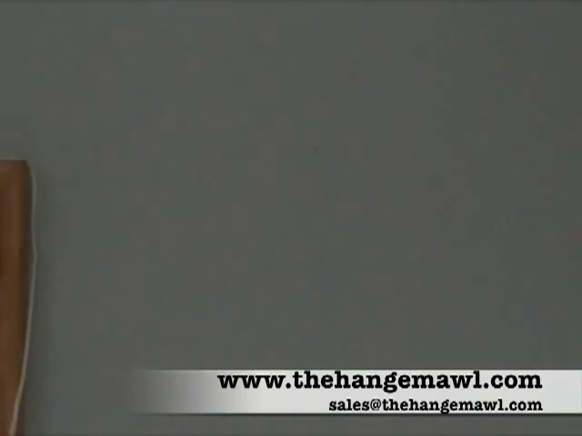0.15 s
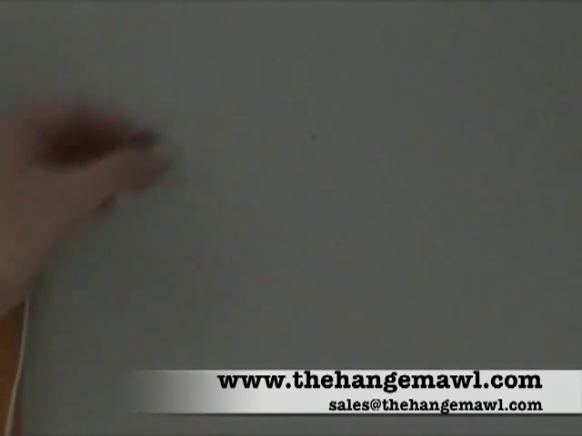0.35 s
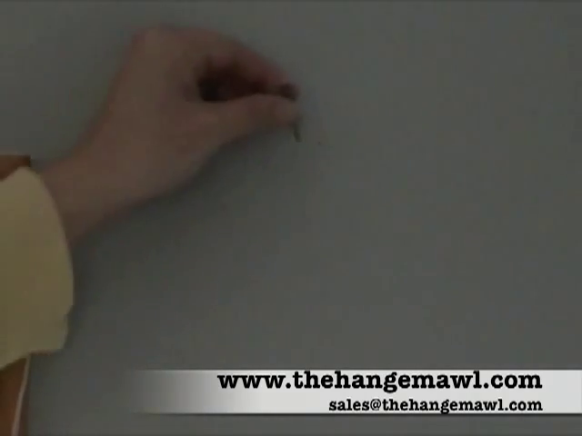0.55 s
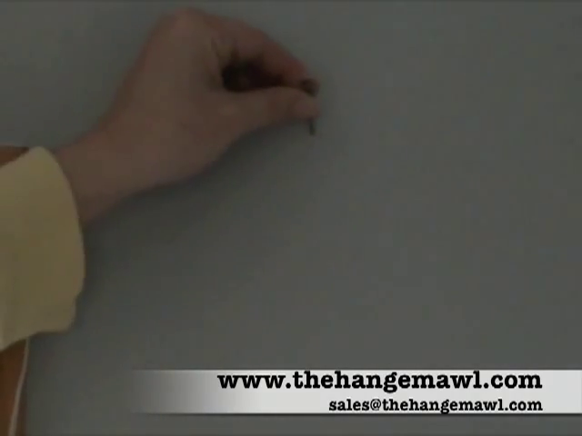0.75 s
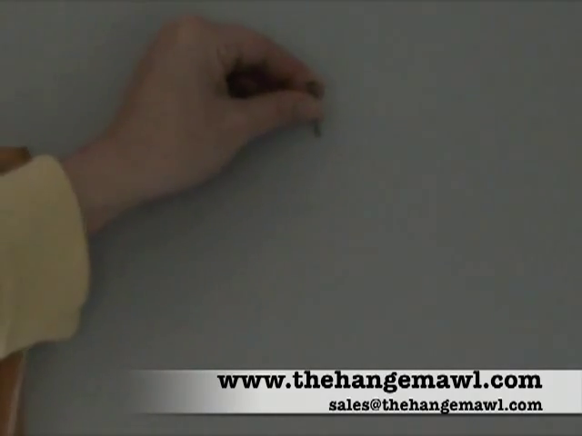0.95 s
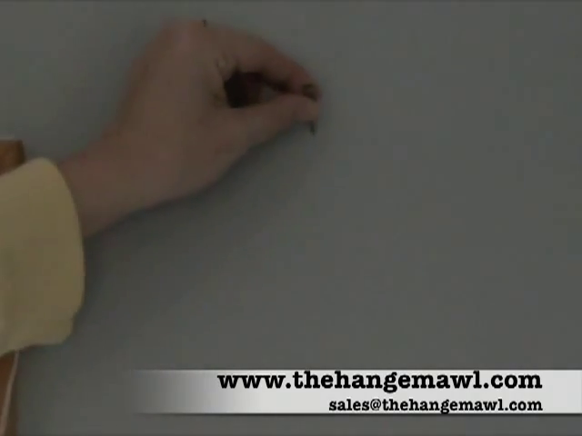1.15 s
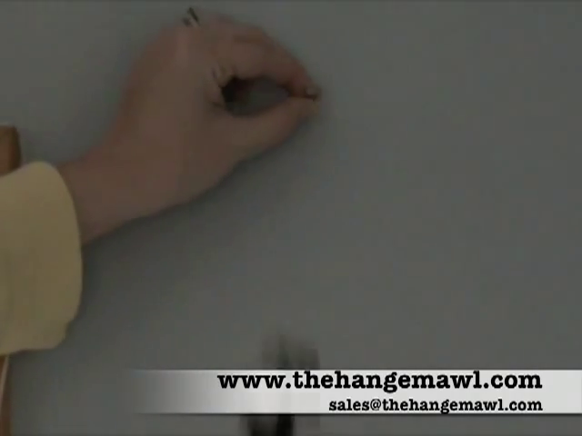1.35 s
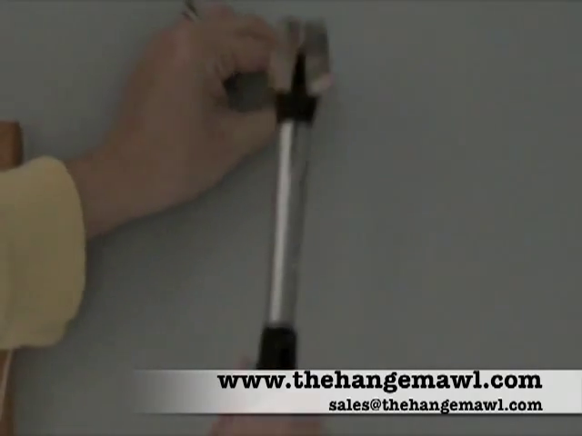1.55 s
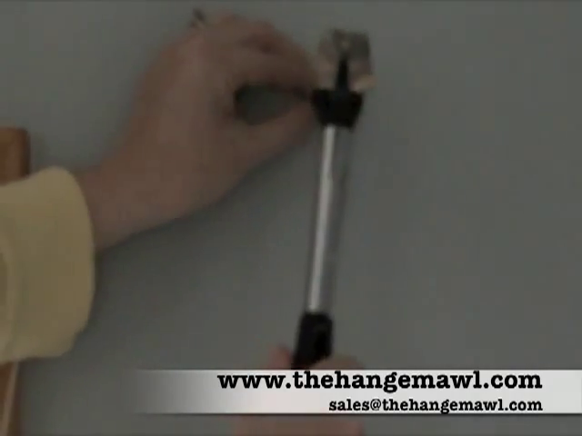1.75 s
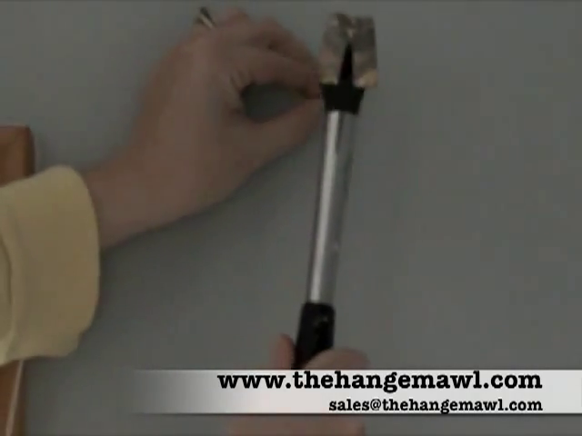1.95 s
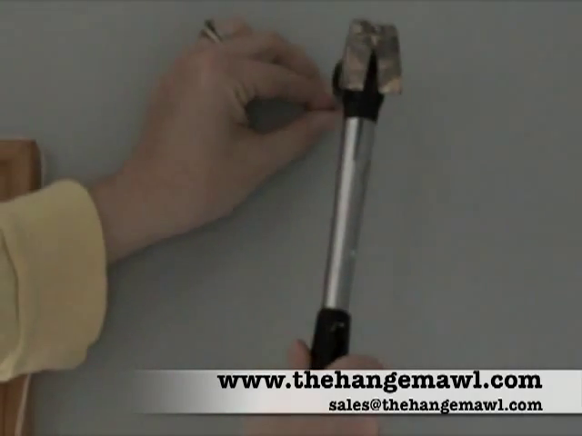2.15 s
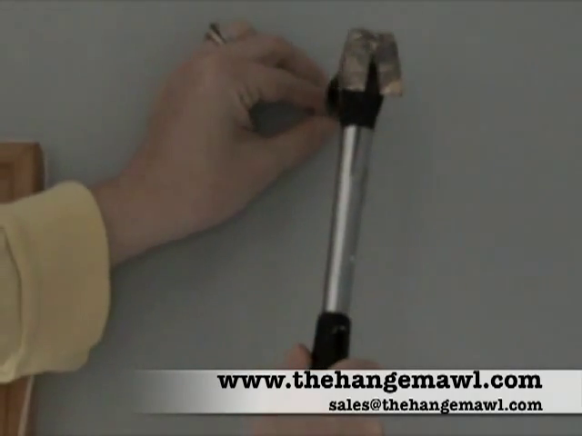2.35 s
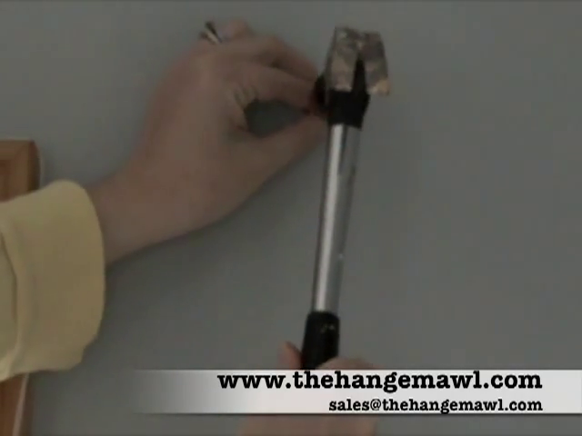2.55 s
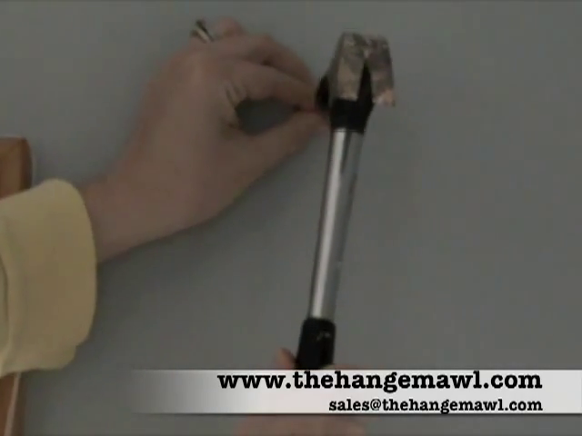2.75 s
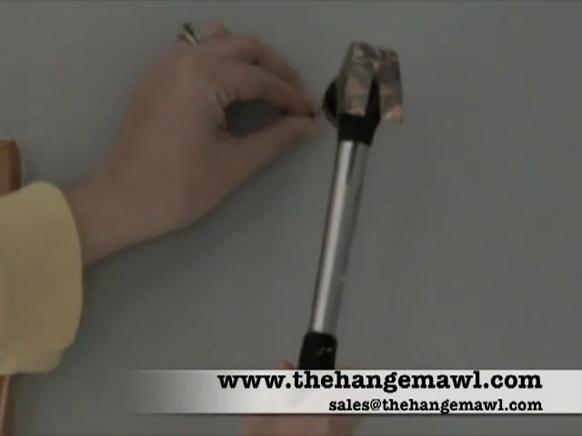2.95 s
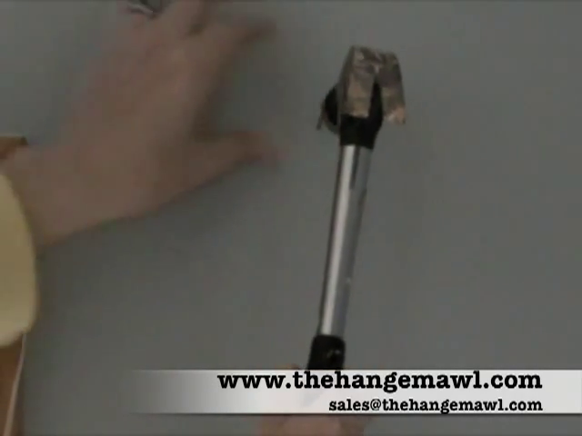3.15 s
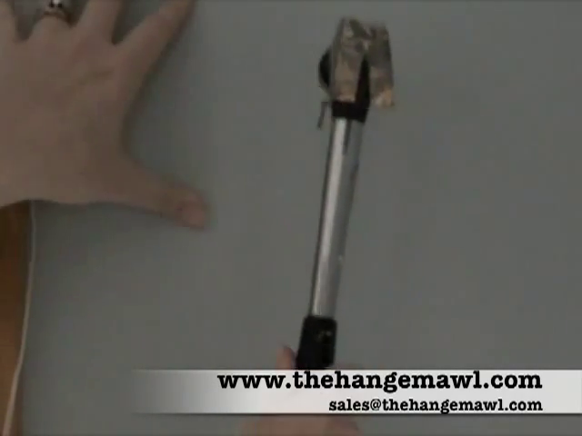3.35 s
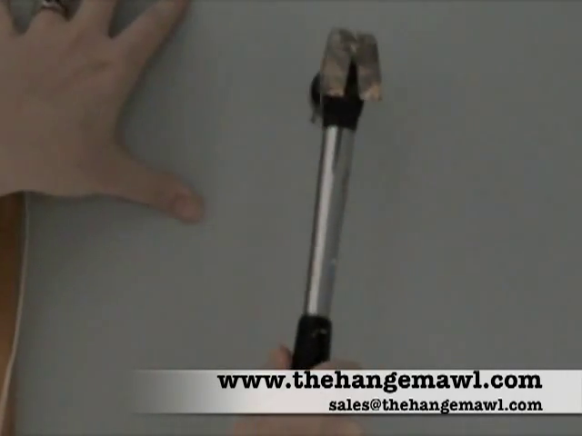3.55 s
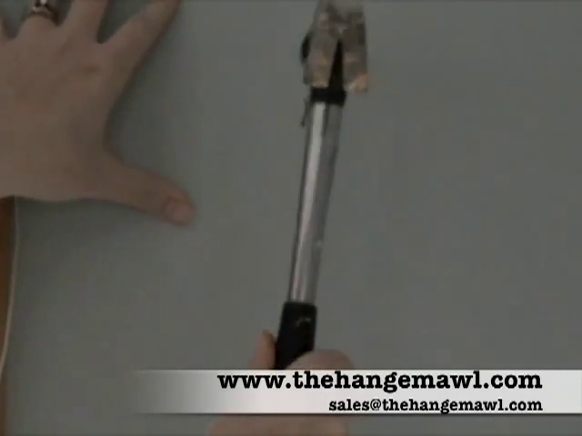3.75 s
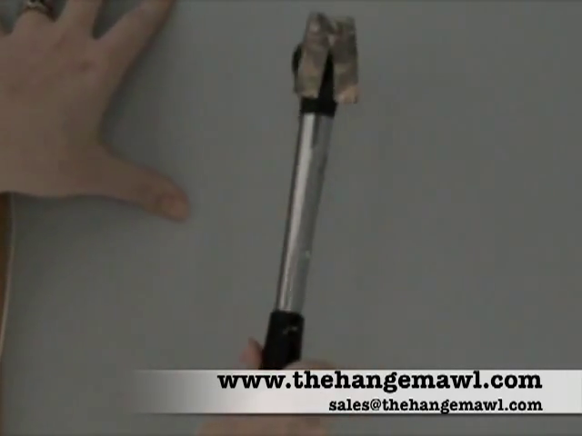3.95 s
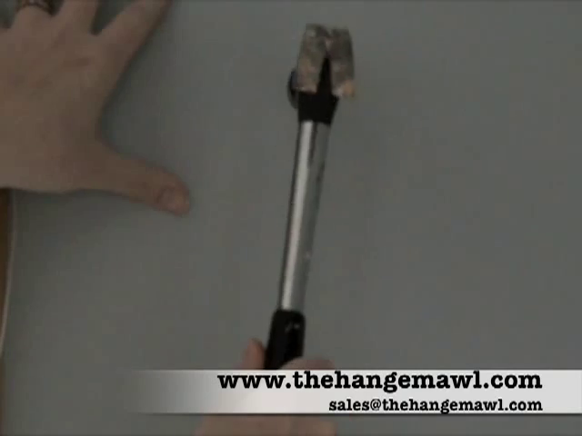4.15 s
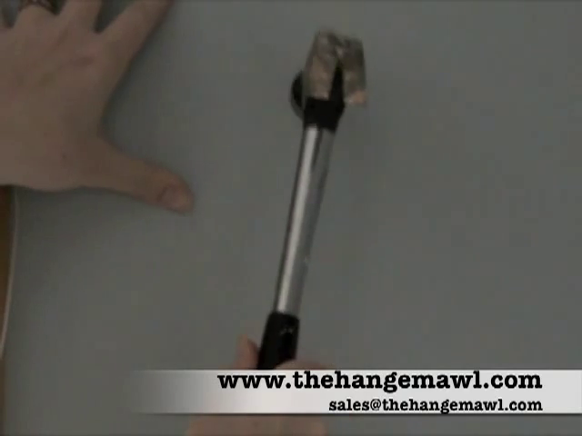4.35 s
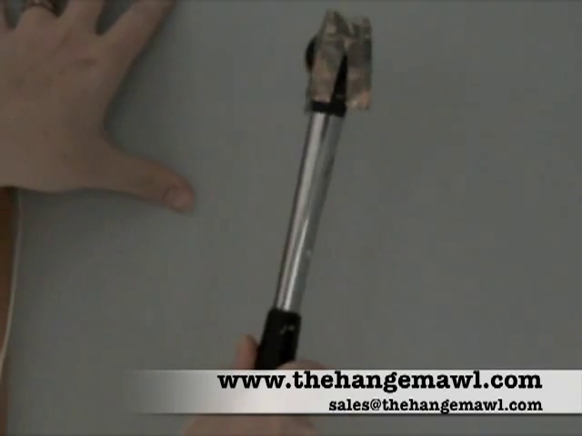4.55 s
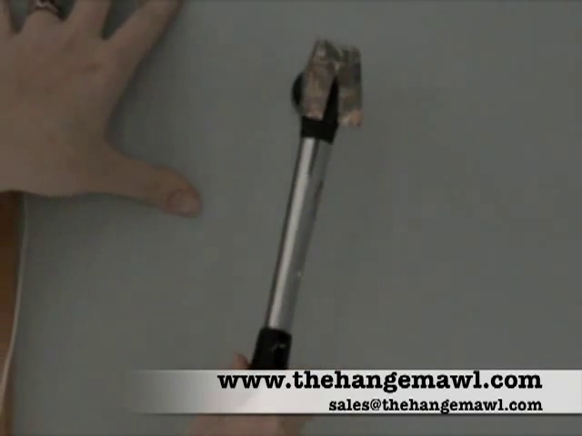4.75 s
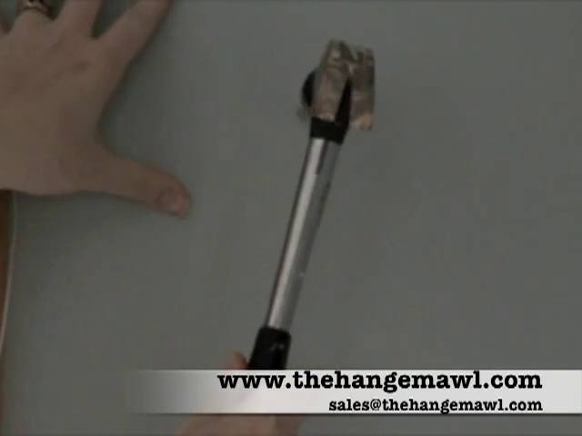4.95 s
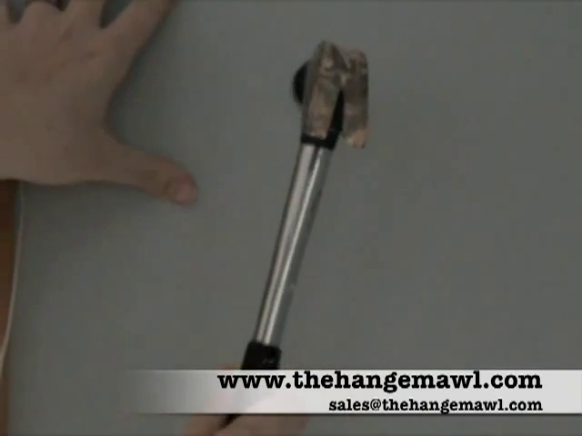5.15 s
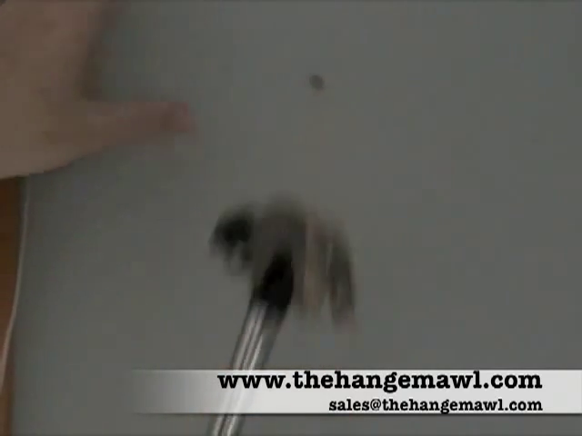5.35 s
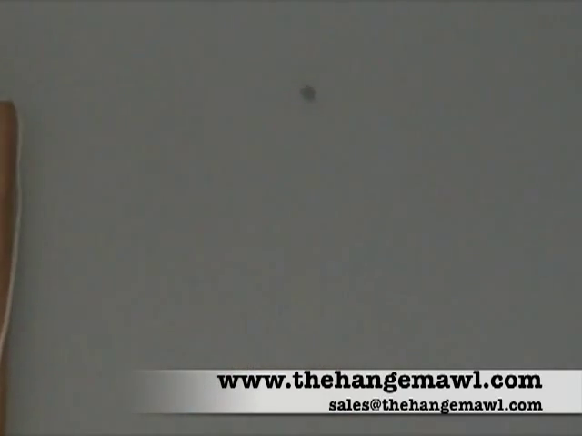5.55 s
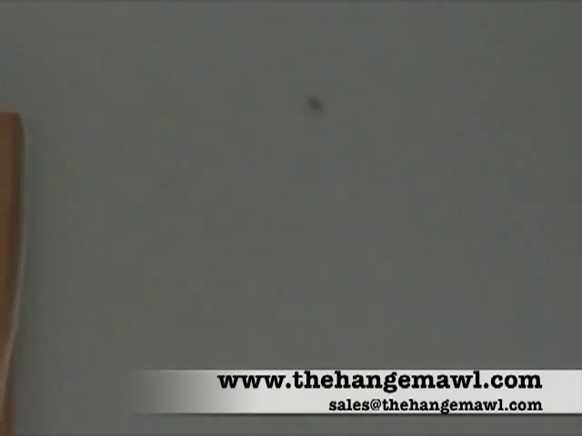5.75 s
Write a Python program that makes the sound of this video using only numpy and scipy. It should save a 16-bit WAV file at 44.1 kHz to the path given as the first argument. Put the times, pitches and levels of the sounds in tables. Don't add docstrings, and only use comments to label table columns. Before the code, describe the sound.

Close stereo microphone in a bare, lively room with quiet air, hiss and a faint steady motor whine. From 0 to 0.7 s there are dull knocks, the strongest near 0.13, with low rumbling weight shifts and sleeve rustle. Then it is nearly quiet, with tiny knocks near 1.3 and 1.55 s. At 2.1 s a light, bright metallic tap hits the nail, followed by full blows at about 2.4, 2.6 and 2.9 s. Each has a sharp steel tick, a hollow wall thump with midrange panel ringing, and a dense room tail of about half a second, squashed by limiting and swelling back. After a pause, a harder, brighter run strikes at 3.6, 3.9, 4.2, 4.45 and 4.7 s, the last clearly weaker. The tail fades into room air. Around 5.5 to 5.8 s come soft knocks, cloth rustle and a short, low, falling floorboard creak.

```python
import sys
import numpy as np
from scipy import signal
from scipy.fft import rfft, irfft
from scipy.io import wavfile
from scipy.ndimage import uniform_filter1d

SR = 44100
rng = np.random.default_rng(int(sys.argv[2]) if len(sys.argv) > 2 else 0)


def field_ratio(decibels):
    return 10 ** (np.asarray(decibels, dtype=float) / 20)


def file_out(sig):
    cols = np.atleast_2d(sig).T
    lim = np.clip(cols, -1, 1)
    pcm = np.round(lim * 32767).astype(np.int16)
    wavfile.write(sys.argv[1], SR, pcm)


N = 255339
SIZE = 1 << 15
T, HZ = np.arange(SIZE) / SR, np.fft.rfftfreq(SIZE, 1 / SR)
LAG = 48

# frequency in Hz, likeness (1 = the same).
NEAR_LIKENESS = [(25, .93), (60, .96), (250, .96), (500, .86), (1000, .8), (2000, .86), (4000, .92),
                 (8000, .95), (13000, .82)]
# frequency in Hz, likeness (below 0 = opposed).
AIR_LIKENESS = [(60, 1.0), (150, 0.97), (380, 0.89), (950, -0.12), (2380, -0.19), (5980, -0.064),
                (15000, 1)]


def evened(x):
    return x / np.sqrt(np.mean(x ** 2) + 1e-20)


def read(points, hz):
    f, value = np.transpose(points)
    return np.interp(np.log(hz + 1), np.log(f + 1), value)


def add(mix, s, sound):
    part = mix[..., round(s * SR):][..., :sound.shape[-1]]
    part += sound[..., :part.shape[-1]]


def rings(modes, t):
    return sum(field_ratio(db - 60 * t / max(t60, .002)) * np.sin(2 * np.pi * hz * t) for hz, db, t60 in modes)


def coloured(x, db):
    gain = np.log(field_ratio(np.concatenate([db, db[-2:0:-1]])))
    response = np.exp(np.conj(signal.hilbert(gain)))[:len(db)]
    return irfft(rfft(x) * response, x.shape[-1])


def pair(a, b, same, lead, tilt_db):
    same, turn = np.clip(same, -1, 1), np.exp(.5j * lead)
    right = same * turn * a + np.sqrt(1 - same ** 2) * b
    return np.array([a / turn * field_ratio(tilt_db / 2), right / field_ratio(tilt_db / 2)])


def ports(shared, unshared, width):
    # frequency in Hz, lead of the right side in radians.
    lead_curve = [(25, .6), (60, 1.1), (125, 1.35), (250, 1.55), (500, 1.1), (1000, .75), (2200, .3),
                  (4000, .25), (7000, .7), (14000, 1.1)]
    # frequency in Hz, left minus right in dB.
    tilt_curve = [(25, -1), (100, -1.6), (250, -2.2), (500, -.6), (2000, 0), (12000, -.9)]
    lead, tilt_db = width * read(lead_curve, HZ), width * read(tilt_curve, HZ)
    z = pair(rfft(shared), rfft(unshared), read(NEAR_LIKENESS, HZ), lead, tilt_db)
    fade_in = np.clip(T * SR / LAG, 0, 1) ** 2
    fade_out = np.clip((T[-1] - T) / .2, 0, 1) ** 2
    return np.roll(irfft(z, SIZE), LAG, 1) * fade_in * fade_out


def noise(spectrum, same, patchy_db):
    hz = np.fft.rfftfreq(1024, 1 / SR)
    a, b, c, d, patches = rng.standard_normal((N // 256 + 5, 513, 5)).T
    patches = evened(uniform_filter1d(uniform_filter1d(patches, 10, 0), 8, 1))
    z = pair(a + 1j * b, c + 1j * d, read(same, hz)[:, None], 0, 0)
    z = z * field_ratio(read(spectrum, hz)[:, None] + patchy_db * patches)
    return evened(signal.istft(z, nperseg=1024, noverlap=768)[1][:, :N])


def tails(count, build_s=0.013):
    # frequency in Hz, seconds to lose 60 dB.
    room_decay = [(40, 0.89), (120, 0.33), (300, 0.33), (1000, 0.51), (3000, 0.46), (6000, 0.41),
                  (10000, 0.3), (15000, 0.28)]
    hz, t, z = signal.stft(rng.standard_normal((count, SIZE)), SR, nperseg=512)
    dying = z * field_ratio(-60 * t / read(room_decay, hz)[:, None])
    tail = signal.istft(dying, SR, nperseg=512)[1][:, :SIZE]
    tail = tail * (1 - np.exp(-(T / build_s) ** 2))
    tail = tail * (1 + 0.41 * np.exp(-((T - .068) / 0.0088) ** 2))
    return tail / np.linalg.norm(tail, axis=1, keepdims=True)


def hush():
    # frequency in Hz, level in dB per Hz.
    air_colour = [(12, -29.5), (20, -21.5), (44, 1.5), (60, -9.5), (194, -6.5), (223, -5.5), (264, -4.5),
                  (579, -12.5), (789, -17.5), (858, -14), (2230, -20.5), (15000, -36.5), (16300, -33.5)]
    # frequency in Hz, level in dB.
    motor_tones = [(839.8, -74), (1260, -87.5), (3332, -86.5), (5760, -89), (6535, -90), (10158, -98.5)]
    t, count = np.arange(N) / SR, len(motor_tones)
    wander = uniform_filter1d(rng.standard_normal((2, count, N // 64 + 1)), 20, 2)
    drift, flicker = wander.repeat(64, 2)[..., :N]
    flicker_db = uniform_filter1d(flicker, 200, 1) * 30 * np.linspace(.2, 1, count)[:, None]
    whine = np.zeros(N)
    for (hz, db), waver, f_db in zip(motor_tones, drift, flicker_db):
        whine += field_ratio(db + 6.5 + f_db) * np.sin(2 * np.pi * hz * t + 0.0034 * np.cumsum(waver))
    return field_ratio(-51.5) * noise(air_colour, AIR_LIKENESS, patchy_db=1.5) + whine


def movements():
    # peak in seconds, rise in seconds, seconds to lose 60 dB, hiss in dB, low body in dB.
    strokes = [(.016, 0.039, 0.094, -55.5, -45), (0.053, .018, 0.31, -45, -27), (.14, .03, 1.1, -65, -32),
               (.345, 0.19, 0.75, -54, -58), (.472, 0.023, 1.3, -59.5, -39.5), (.928, 0.11, 0.24, -62, -56),
               (1.128, .04, .9, -63.5, -56), (1.48, 0.33, 0.84, -68, -55.5), (3.51, 0.027, .1, -64, -56),
               (3.56, 0.029, .1, -62, -53), (5.505, .05, .4, -64, -67), (5.588, 0.077, 0.5, -56.5, -54),
               (5.69, .08, .6, -63.5, -51), (5.785, .06, 0.36, -65, -57)]
    # frequency in Hz, level in dB per Hz.
    cloth_colour = [(290, -43), (500, -1.5), (777, -24.5), (1080, -12), (2100, -18), (2330, -17),
                    (7580, -25), (15000, -40)]
    rise_db = 20
    t, hiss, body = np.arange(N) / SR, np.zeros(N), np.zeros(N)
    for s, rise_s, t60, hiss_db, body_db in strokes:
        stroke = field_ratio(np.where(t < s, rise_db * (t - s) / rise_s, -60 * (t - s) / t60))
        hiss += field_ratio(hiss_db) * stroke
        body += field_ratio(body_db) * stroke
    rumble = noise([(20, 3.5), (60, -2.5), (300, -13.5), (900, -82)], AIR_LIKENESS, patchy_db=4.0)
    cloth = noise(cloth_colour, NEAR_LIKENESS, patchy_db=2.0)
    return field_ratio(3.5) * hiss * cloth + field_ratio(-2.0) * body * rumble


def creak():
    sigh = (5.527, .095, -45, 565, 525)
    s, length, db, from_hz, to_hz = sigh
    t, out = np.arange(0, length + .03, 1 / SR), np.zeros((2, N))
    hz = from_hz + (to_hz - from_hz) * t / length
    jolt = .45 + np.exp(-t / .015)
    level = jolt * np.clip(t / .003, 0, 1) * np.clip((length + .03 - t) / .03, 0, 1)
    unsteady_db = 2.0 * evened(uniform_filter1d(rng.standard_normal(8000), 400))[:len(t)]
    tone = field_ratio(db) * level * field_ratio(unsteady_db) * np.sin(2 * np.pi * np.cumsum(hz) / SR)
    add(out, s, np.array([tone, tone]))
    return out


def knocks():
    # start in seconds, peak in dB, ring in Hz, thud in dB, rattle in dB.
    knock_rows = [(0.047, -19.5, 600, 0.5, 2.5), (0.127, -10.5, 756, -11, -3.5),
                  (0.459, -33, 330, -10, -15), (0.535, -27.5, 580, -16, -3.5), (0.687, -24.5, 576, -29, -8),
                  (1.336, -44, 310, -21, -4), (1.553, -47, 453, -19, -2), (2.033, -37, 570, -19, -9),
                  (3.569, -68, 304, -15, 15), (5.239, -66, 433, 1, 2), (5.494, -38, 640, -5, -2.5),
                  (5.506, -32, 640, -21, -11), (5.654, -55, 330, -11, 8), (5.738, -45, 577, 0, 4),
                  (5.772, -38, 590, -29, -1)]
    ring_cycles = 10.7
    thud_s = 0.0041
    out, rooms, t = np.zeros((2, N)), tails(count=4), T[:8000]
    band = signal.butter(3, [300, 1600], "bandpass", fs=SR, output="sos")
    grit = signal.sosfilt(band, rng.standard_normal((len(knock_rows), len(t))))
    for k, (s, db, hz, thud_db, rattle_db) in enumerate(knock_rows):
        ring = rings([(hz, 0, ring_cycles / hz), (340, rattle_db - 2, .04)], t)
        rattle = field_ratio(rattle_db + 2 - 60 * t / 0.041) * grit[k]
        hit = (ring + rattle) * np.clip(t / 0.0018, 0, 1)
        thud = rings([(64.7, thud_db, 0.14), (142, thud_db - 5.5, 0.077)], np.maximum(t - thud_s, 0))
        wet = signal.fftconvolve(hit[None], rooms[[k % 3, 3]], axes=1)[:, :SIZE]
        wet = field_ratio(-3 + 0.47 * rattle_db) * wet
        near = np.pad(hit + thud, (0, SIZE - len(t)))
        add(out, s - LAG / SR, field_ratio(db) * ports(near + wet[0], wet[1], 0.9))
    return out


def blow(row, shared, unshared, chatter):
    # frequency in Hz, level in dB per Hz.
    wall_colour = [(15, -29), (30, -11), (95, -13.5), (165, -1), (270, 4.5), (390, -6.5), (520, -5.5),
                   (1050, -14.5), (1300, -18), (1600, -14), (3200, -18), (5200, -24.5), (8600, -28),
                   (15200, -48)]
    # frequency in Hz, level in dB, seconds to lose 60 dB.
    panel_modes = [(209.5, -3.5, 0.52), (234.4, -0.5, 0.59), (253, -1.5, 0.28), (283.7, -1, 0.29),
                   (314.7, 4.5, 0.44), (439.6, 6, 0.31), (489, -0.5, 0.2), (538, -7, 0.52),
                   (685, -4.5, 0.52), (762, -11, 0.33), (1170, -2.5, 0.21), (1424, -6.5, 0.46),
                   (1662, -4, 0.3), (1990, -2, 0.34)]
    # frequency in Hz, level in dB, seconds to lose 60 dB.
    steel_modes = [(2020, -43, 0.0042), (3360, -20, 0.0041), (5900, -11, 0.0049), (8950, -5, 0.0044),
                   (10200, -12, 0.003), (11100, -18, 0.0022), (13200, -30, 0.0033)]
    # frequency in Hz, level in dB, seconds to lose 60 dB.
    boom_modes = [(39.9, -32, 0.98), (85.3, -16.5, 0.38), (105.5, -16.5, .3), (120.2, -0.5, 0.093),
                  (139.3, -13.5, 0.31), (337, -2.5, 0.019)]
    # delay in seconds, level in dB.
    first_echoes = [(.0167, -8), (.0085, -19), (.026, -20), (.033, -17)]
    push_s = .0031
    s, force_db, hard_db, boom_db, tick_db = row

    octave = np.log2(np.maximum(HZ, 30) / 1000)
    colour = read(wall_colour, HZ) + hard_db * np.clip(octave, -1, 4)
    colour = colour - 25 * np.clip(HZ / 2000 - 7.2, 0, 2)
    colour = colour + .5 * boom_db / (1 + (HZ / 200) ** 2)
    colour = colour + 0.64 * tick_db / (1 + (4800 / (HZ + 1)) ** 4)
    scrape = chatter * T * np.exp(-T / .001)
    room, other, grit = coloured(np.array([shared, unshared, scrape]), colour)
    size = field_ratio(-29) / np.std(room)

    fore = .3 * np.sin(2 * np.pi * 1800 * 2 ** (hard_db / 6) * T) * np.exp(-(T / .0008) ** 2)
    spike = -np.exp(-((T - .0014) / .00026) ** 2)
    tick = field_ratio(tick_db - 21) * rings(steel_modes, T) * np.clip(T / 0.0015, 0, 1) ** 2
    grit = grit - .85 * np.roll(grit, 2)
    shank = field_ratio(-18.5 + 2.8 * hard_db) * rings([(3375, 0, 0.011), (4120, -8, 0.019), (668, 1, 0.0067)], T)
    crack = field_ratio(-.3 * boom_db) * (fore + shank + spike) + tick + field_ratio(-10) * grit / abs(grit).max()

    boom = field_ratio(boom_db - 5.5) * rings(boom_modes, np.maximum(T - push_s, 0))
    panel = field_ratio(-26.5) * rings(panel_modes, np.maximum(T - .0014, 0))
    echoes = sum(field_ratio(db) * np.roll(crack - .5 * spike, round(d * SR)) for d, db in first_echoes)
    direct = crack + boom + panel + echoes
    return s + .0005 - LAG / SR, field_ratio(force_db - 13) * ports(direct + size * room, size * other, 1)


def hammer():
    # start in seconds, force in dB, hardness in dB per octave, wall boom in dB, steel tick in dB.
    blow_rows = [
        (2.093, 6.5, -3.5, 10.5, 22.5),
        (2.366, 22, -3, 3, 6.5),
        (2.616, 21.5, -1, -1.5, -9.5),
        (2.86, 23, -1.5, -1.5, -6),
        (3.6054, 23.5, 1.5, 3, -12.5),
        (3.900, 24, 2, -2.5, -11.5),
        (4.1733, 22, 2, -2.5, -7),
        (4.447, 21, 1, -4, -3),
        (4.7243, 14.5, 2, -5, -6),
    ]
    count = len(blow_rows)
    a, b, c, *own = tails(count=3 + count)
    out, chatter = np.zeros((2, N)), rng.standard_normal((count + 1, SIZE))
    turns = .22 * (np.arange(count) - 4)
    for row, turn, mine, grit in zip(blow_rows, turns, own, chatter):
        common = np.cos(turn) * a + np.sin(turn) * b
        add(out, *blow(row, .72 * common + .36 * mine, c, chatter[-1] + .4 * grit))
    return out


def scene():
    return hammer() + knocks() + movements() + hush() + creak()


def starved(x):
    mid_side_hz, loud_db = (14100, 4800), -29.5
    power_db = 10 * np.log10(abs(uniform_filter1d((x ** 2).mean(0), 2400)) + 1e-12)
    lasting_db = np.minimum(power_db, np.roll(power_db, 1700))
    busy = uniform_filter1d(1. * (lasting_db > loud_db), 300)
    tops = [signal.firwin(255, hz, window=("kaiser", 7), pass_zero=False, fs=SR) for hz in mid_side_hz]
    both = np.array([x[0] + x[1], x[0] - x[1]]) / 2
    mid, side = both - busy * signal.oaconvolve(both, np.array(tops), "same", axes=1)
    return np.array([mid + side, mid - side])


def low_pass(x):
    return signal.sosfilt(signal.butter(12, 15750, fs=SR, output="sos"), x)


def record(dry):
    peak_db = 20 * np.log10(abs(dry).max(0) + 1e-9)
    fall = np.arange(N) * 230 / SR
    held_db = np.maximum.accumulate(peak_db + fall) - fall
    over_db = np.maximum(held_db + 4.2, 0)
    early_db = uniform_filter1d(np.roll(over_db, -75), 30)
    keep = np.exp(-1 / (1.4 * SR))
    slow_db = 2.0 * signal.lfilter([1 - keep], [1, -keep], over_db)
    mix = starved(dry / field_ratio(early_db + slow_db))
    return low_pass(mix)


dry = scene()
out = record(dry)
file_out(out)
```